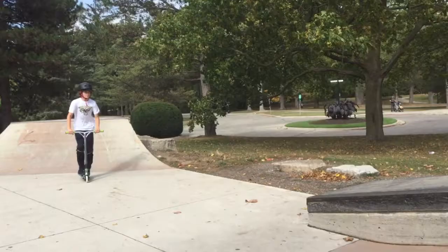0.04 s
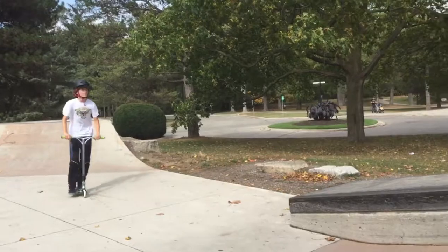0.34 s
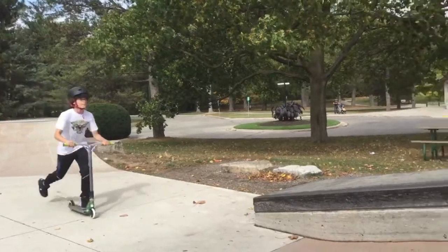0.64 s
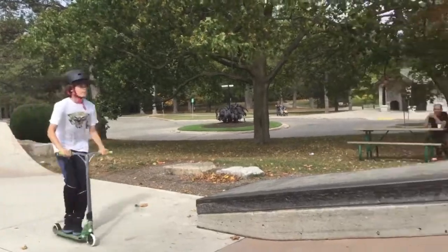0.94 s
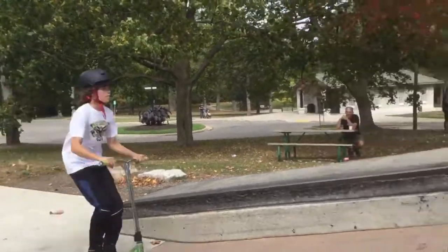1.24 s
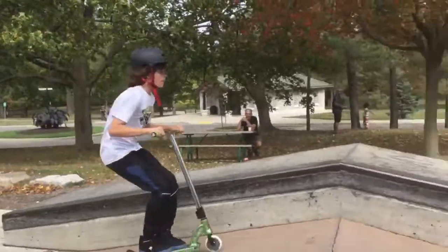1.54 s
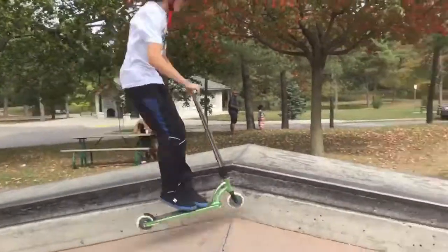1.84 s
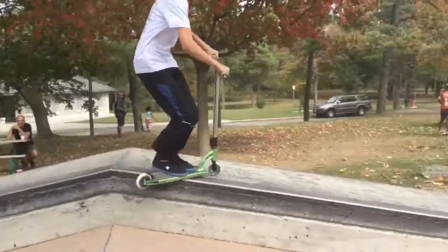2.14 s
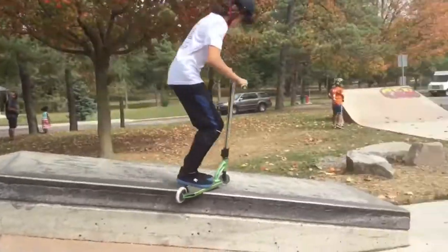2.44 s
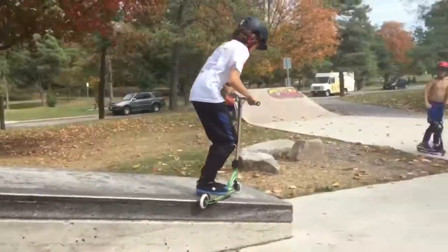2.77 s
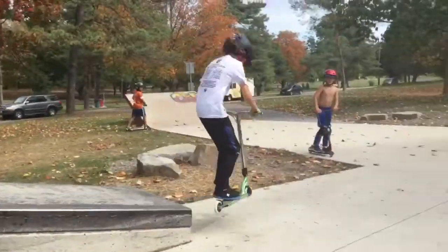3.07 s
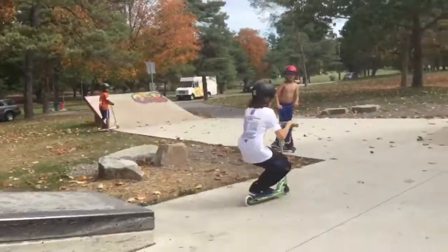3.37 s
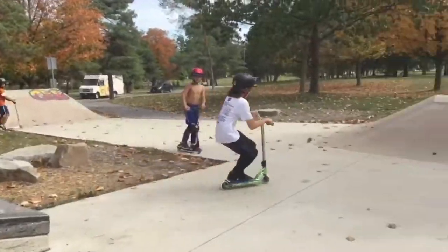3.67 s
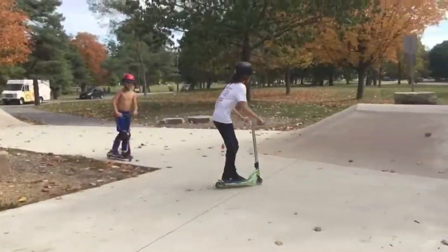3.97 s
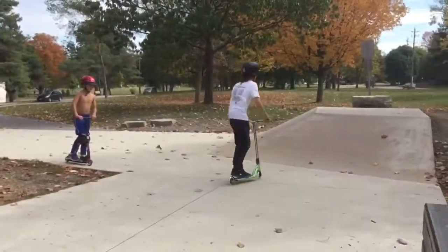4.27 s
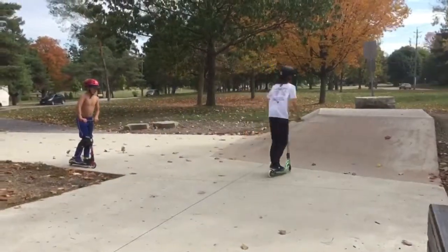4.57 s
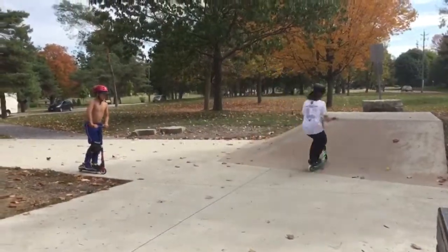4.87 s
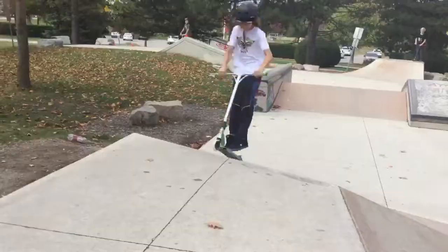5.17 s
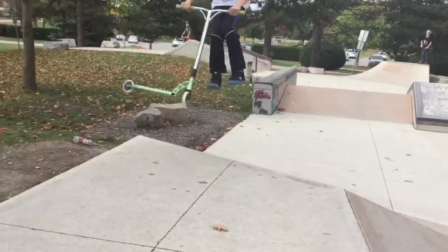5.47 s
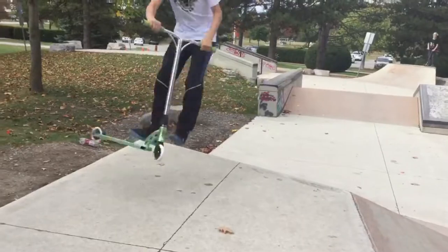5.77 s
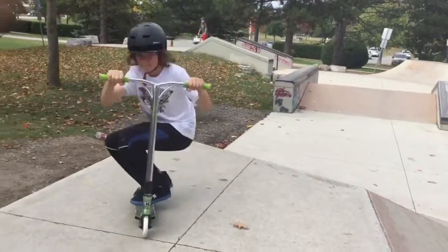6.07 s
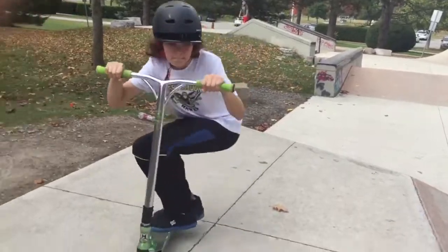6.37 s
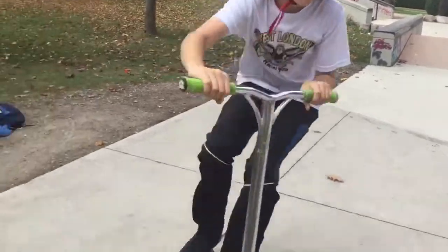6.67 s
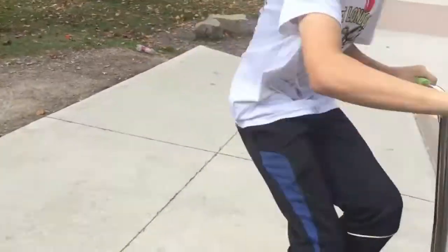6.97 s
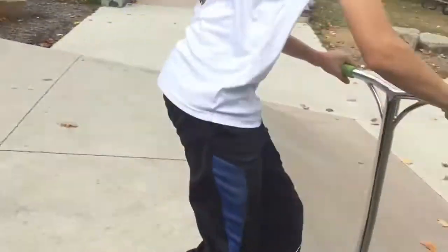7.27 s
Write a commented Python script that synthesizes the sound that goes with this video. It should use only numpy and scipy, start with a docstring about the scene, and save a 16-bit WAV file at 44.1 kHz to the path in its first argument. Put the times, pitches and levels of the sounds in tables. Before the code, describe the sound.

A stunt scooter rolls over concrete with a low rumble, light scuffs and ticking grit, heard through a small microphone against the soft wash of an outdoor skate park. A very faint bird whistle falls at about 1 second. At 2.2 seconds the deck hits a steel-edged ledge with a loud, ringing clack, then grinds along it with a rough metallic rasp until 3 seconds. The scooter clacks down at 3.3 seconds and rolls on, snapping over small stones. At 5.2 seconds the microphone changes spot, the background turns duller and a bird gives one short rising chirp. A jump lands with a heavy thump just before 6 seconds. The wheels then come close with growing hiss and rattle, and another sharp clack comes at 7 seconds. Loose parts knock and the hollow metal tubes clank loudly at around 7.3 seconds.

```python
"""A concrete skate park among trees, heard through one small microphone from two spots in turn.
From the first, a stunt scooter rolls on hard wheels, hops onto a steel-edged ledge, grinds and drops off.
From the second, it lands a jump and rattles past close by, its hollow metal tubes clanking.
Under it all: the rumble of the wheels, the wash of the open park, ticking grit and two faint bird calls."""
import sys
import numpy as np
from scipy import signal
from scipy.fft import rfft, irfft
from scipy.io import wavfile
from scipy.ndimage import map_coordinates

SR = 44100
rng = np.random.default_rng(int(sys.argv[2]) if len(sys.argv) > 2 else 0)


def pcm_store(signal):
    """Save signal as 16-bit PCM."""
    levels = np.round(np.clip(np.atleast_2d(signal), -1, 1) * 32767)
    wavfile.write(sys.argv[1], SR, levels.astype(np.int16).T)


N = 327222
TIME = np.arange(N) / SR


def from_db(db):
    """Decibels to gain."""
    return 10 ** (np.asarray(db) / 20)


def unit_rms(x):
    """Scale to rms 1."""
    return x / np.sqrt(np.mean(x ** 2) + 1e-20)


def at_level(burst, db):
    """Give a burst the energy of 10 ms at this level."""
    return burst / np.linalg.norm(burst) * np.sqrt(SR / 100) * from_db(db)


def curves(rows):
    """Each column after the time column, interpolated at every sample."""
    times, *columns = np.transpose(rows)
    return [np.interp(TIME, times, column) for column in columns]


def after(start_s, fade_s=0.069):
    """Fade from 0 to 1."""
    return np.clip((TIME - start_s) / fade_s, 0, 1)


def add(out, start_s, sound):
    """Mix a sound in at its start time."""
    i = int(round(start_s * SR))
    out[i:i + len(sound)] += sound[:N - i]


def cut(x, hz, kind, order=2):
    """Butterworth filter."""
    return signal.sosfilt(signal.butter(order, np.clip(hz, 10, .48 * SR), kind, fs=SR, output="sos"), x)


def resonate(x, hz, width_hz):
    """One resonance with gain 1 at its peak."""
    r = np.exp(-np.pi * width_hz / SR)
    feedback = [1, -2 * r * np.cos(2 * np.pi * hz / SR), r * r]
    return signal.lfilter(np.array([1, 0, -1]) * (1 - r * r) / 2, feedback, x)


def colour(x, spectrum):
    """Give a steady sound a spectrum."""
    hz, db = np.transpose(spectrum)
    gain_db = np.interp(np.log(np.fft.rfftfreq(N, 1 / SR) + 1), np.log(hz), db)
    return irfft(rfft(x) * from_db(gain_db), N)


def drift(rate_hz):
    """A random wander, rms 1."""
    knots = rng.standard_normal(int(2 * rate_hz * N / SR) + 2)
    return unit_rms(np.interp(TIME * 2 * rate_hz, np.arange(len(knots)), knots))


def waver(x, share, rate_hz):
    """Bend all pitches of a sound up and down by a small share."""
    return map_coordinates(x, [np.arange(N) + np.cumsum(share * drift(rate_hz))], order=3, mode="mirror")


def grains(per_s, spread_db=2.0):
    """Random clicks of uneven size, rms 1."""
    sizes = from_db(spread_db * np.minimum(rng.exponential(1, N), 4)) * rng.choice([-1, 1], N)
    return unit_rms(sizes * (rng.random(N) < per_s / SR))


def contact(t60_s, snap):
    """One sharp touch, then a dying crunch of tiny collisions."""
    t = TIME[:SR // 10]
    crunch = rng.standard_normal(len(t)) * np.exp(-np.log(1000) * t / t60_s)
    return crunch / np.linalg.norm(crunch) + snap * (t == 0)


def clack(hz, t60_s, breadth, snap):
    """A contact heard through a broad resonance."""
    return resonate(resonate(contact(t60_s, snap), hz, breadth * hz), hz, breadth * hz)


def struck(modes, hits):
    """A body rings; every hit meets each mode with a strength that differs by about 1 dB."""
    hz, mode_db, t60_s = np.transpose(modes)
    out, t = np.zeros(N), TIME[:SR // 2]
    rings = np.sin(2 * np.pi * hz[:, None] * t) * np.exp(-np.log(1000) * t / t60_s[:, None])
    for start_s, hit_db in hits:
        add(out, start_s, from_db(hit_db + mode_db + rng.standard_normal(len(hz))) @ rings)
    return out


def rubs(rows):
    """Short swells of friction noise, each inside one resonance."""
    out, t = np.zeros(N), TIME[:SR // 2]
    middle_s = t[-1] / 2
    for peak_s, length_s, hz, width_hz, db in rows:
        swell = np.exp(-2 * ((t - middle_s) / length_s) ** 2)
        friction = resonate(resonate(rng.standard_normal(len(t)), hz, width_hz), hz, width_hz)
        add(out, peak_s - middle_s, from_db(db) * swell * unit_rms(friction))
    return out


def rolling_bed(spectrum, rumble_db, wash_db, treble_db, rattle_db):
    """Hard wheels rumble and loose parts rattle; fine grit and the trees make a wash topped with hiss."""
    noise = colour(rng.standard_normal(N), spectrum)
    grit = colour(grains(per_s=14000), spectrum)
    rumble = unit_rms(cut(noise, 418, "low", order=4) + 0.48 * resonate(noise, 229, 220))
    wash = unit_rms(cut(noise, [450, 5500], "band", order=5)) * from_db(drift(17))
    hiss = unit_rms(cut(grit, 5800, "high", order=5)) * from_db(0.93 * drift(29))
    parts = [clack(hz, t60_s=.04, breadth=0.43, snap=.2) for hz in np.geomspace(2200, 9000, num=6)]
    rattle = sum(signal.oaconvolve(grains(per_s=5), unit_rms(part))[:N] for part in parts)
    treble = 0.75 * hiss + from_db(rattle_db) * unit_rms(rattle)
    return from_db(rumble_db) * rumble + from_db(wash_db) * wash + from_db(treble_db) * treble


# wheels and park from the first spot: frequency_hz, density_db
FIRST_SPECTRUM = [(26, -57), (45, -28.5), (68, -18.5), (217, -2), (355, -11), (401, -15), (672, -9),
                  (1510, -7.5), (1800, -7.5), (2600, -11), (3850, -21.5), (6290, -14), (12500, -23.5),
                  (16000, -28)]
# how strongly the rolling reaches the microphone there: time_s, gain_db
ROLLING = [(0.35, -0.5), (1.7, 1.5), (3.3, -4), (5.2, -0.5)]

def first_spot(lift_s=2, drop_s=3.25, pass_s=3.05):
    """The rumble sinks while the wheels are off the slab, the treble once the scooter points away."""
    roll_db, = curves(ROLLING)
    lifted = after(lift_s) - after(drop_s)
    return rolling_bed(FIRST_SPECTRUM, rumble_db=-44 + roll_db - 3.5 * lifted,
                       wash_db=-42 + 0.58 * roll_db,
                       treble_db=-47.5 + 0.41 * roll_db - 3 * after(pass_s), rattle_db=-6)


# scuffs on the concrete: peak_s, length_s, pitch_hz, width_hz, level_db
SCUFFS = [(0.31, 0.045, 2500, 3000, -46), (0.555, 0.021, 1290, 2480, -39), (0.75, 0.021, 2140, 3000, -38),
          (1.09, 0.025, 1600, 2600, -43), (4.62, 0.13, 4160, 900, -48), (4.86, 0.015, 5900, 5000, -37.5),
          (6.925, 0.039, 1000, 350, -40)]

def scuffs():
    """Shoes and tyres rub briefly on the slab."""
    return rubs(SCUFFS)


# larger stones and joints in the slab: start_s, level_db
TICKS = [(0.744, -37), (1.2994, -32), (1.93, -34), (3.0748, -34.5), (3.928, -30), (4.0696, -30),
         (4.8864, -26), (6.6774, -35.5), (6.737, -31.5), (6.7847, -31.5)]
# low thuds, through the wheels or, at 2.217 s and 3.258 s, from the hollow ledge: start_s, level_db
BUMPS = [(0.765, -37), (1.11, -43), (1.428, -38), (2.217, -24.5), (3.258, -24), (3.612, -36.5)]

def ticks_and_bumps():
    """Stones snap under the wheels and spray fine grit; low thuds come through the wheels and from the hollow
    ledge."""
    out = np.zeros(N)
    for start_s, db in TICKS:
        snap = clack(hz=2850, t60_s=0.069, breadth=0.76, snap=0.83)
        spray = cut(contact(t60_s=.035, snap=0.24), 6600, "high")
        add(out, start_s, at_level(snap, db - 10.5) + at_level(spray, db - 12))
    for start_s, db in BUMPS:
        add(out, start_s, at_level(clack(hz=151.6, t60_s=0.02, breadth=0.74, snap=0.91), db))
    return out


# two calls, faint at the microphone, one list each: time_s, pitch_hz, level_db
BIRD_CALLS = [
    [(0.9, 4630, -58), (0.97, 4500, -54), (1.14, 4350, -61), (1.18, 4330, -66)],
    [(5.25, 5900, -62), (5.265, 6600, -39), (5.283, 7600, -47), (5.3, 8200, -56)],
]

def birds(blurs_hz=(50, 520)):
    """A thin falling whistle, and an upward chirp that buzzes with fast pitch jitter."""
    out = np.zeros(N)
    for call, blur_hz in zip(BIRD_CALLS, blurs_hz):
        hz, db = curves(call)
        singing = (TIME > call[0][0]) & (TIME < call[-1][0])
        phase = 2 * np.pi * np.cumsum(hz + blur_hz * drift(700)) / SR
        out += singing * from_db(db) * np.sin(phase)
    return out


# modes of steel on steel: pitch_hz, level_db, t60_s
EDGE_MODES = [(870, -7, 0.14), (2220, -4, 0.14), (4350, -6.5, .17), (6920, 0.5, 0.079), (11150, -2, 0.065),
              (12280, 0.5, 0.061)]
# the deck meets the ledge: start_s, level_db
EDGE_HITS = [(2.2113, -28.5), (2.2172, -18.5)]

def ledge_edge():
    """The ledge's steel edge rings clear as the deck hits it."""
    return cut(struck(EDGE_MODES, EDGE_HITS), 360, "high")


# modes of the deck under the rider's feet: pitch_hz, level_db, t60_s
DECK_MODES = [(277, -4, 0.059), (326, -4.5, 0.03), (404, -2.5, 0.041), (617, -11.5, 0.033),
              (760, -11.5, 0.034), (1057, 0.5, 0.032), (1290, -15, 0.07), (1605, -10, 0.037),
              (2965, -33.5, 0.4), (8340, -30.5, 0.09)]

def blow(start_s, thump_db, clack_db, hz, t60_s, grit_db):
    """One blow clacks, crushes grit and thumps the deck, which is too small to radiate deep bass."""
    out = cut(struck(DECK_MODES, [(start_s, thump_db)]), 220, "high", order=3)
    grit = cut(contact(t60_s + 0.025, snap=0.25), [4800, 13500], "band")
    add(out, start_s, at_level(clack(hz, t60_s, breadth=0.8, snap=0.89), clack_db))
    add(out, start_s, at_level(grit, grit_db))
    return out


# wheels and deck come down on concrete:
# start_s, clack_db, pitch_hz, crunch_t60_s, grit_db, weight_lag_s, weight_db, thump_db, rebound_db
LANDINGS = [ (2.2118, -8.5, 2190, 0.042, -20, .009, -16.5, -19.5, -11),
            (3.2528, -15, 1610, .018, -33.5, .005, -27.5, -15.5, -17),
            (5.879, -36, 1800, 0.044, -37, .0085, -43, -24.5, -19),
            (5.94, -19, 1840, .027, -21, .0014, -16.5, -2, -15.5),
            (6.946, -29.5, 5660, .04, -29.5, .0075, -24.5, -31.5, -14),
            (6.9686, -18, 4530, .01, -35, .0032, -19, -14, -31)]

def landings(rebound_lag_s=.037):
    """A hard touch, then the rider's weight, duller on the squashed wheel, then a soft rebound."""
    out = np.zeros(N)
    for start_s, clack_db, hz, t60_s, grit_db, lag_s, weight_db, thump_db, rebound_db in LANDINGS:
        touch = blow(start_s, thump_db - 7.5, clack_db, hz, t60_s, grit_db)
        weight = blow(start_s + lag_s, thump_db, weight_db, 0.54 * hz, 1.6 * t60_s, grit_db - 8)
        rebound = blow(start_s + rebound_lag_s, thump_db + rebound_db, weight_db + rebound_db,
                       0.53 * hz, t60_s=.085, grit_db=grit_db - 13.5)
        out += touch + weight + rebound
    return out


# the slide along the ledge, from the first spot: time_s, level_db
GRIND_LEVELS = [(2.27, -28.5), (2.386, -38.5), (2.476, -24.5), (2.802, -33), (2.82, -29.5), (2.854, -35),
                (2.932, -34), (3.006, -23), (3.05, -48)]
# colour of the scrape: frequency_hz, density_db
GRIND_SPECTRUM = [(100, -33), (200, -5), (340, 2.5), (540, -13), (720, 1), (1700, 6), (3000, -3.5),
                  (5000, -4), (9500, -16.5), (12200, -6), (16000, -25)]
# resonances of the sliding deck: pitch_hz, width_hz, level_db
GRIND_MODES = [(330, 69, -28), (1000, 14, -10), (1570, 220, 0), (2050, 59, 3), (2830, 180, 6.5),
               (3490, 170, 0), (4050, 120, 0), (7000, 69, -15), (8800, 110, -12), (11700, 110, -17),
               (12200, 46, -23)]
# the slide catches on one resonance for a moment: peak_s, length_s, pitch_hz, width_hz, level_db
CATCHES = [(2.495, 0.05, 1000, 130, -25.5), (2.61, 0.06, 2000, 400, -35), (2.735, 0.047, 700, 60, -36.5),
           (2.818, 0.033, 2905, 130, -28.5), (2.965, 0.08, 312, 117, -37.5)]

def grind(judder_db=2.0, wander_db=2.5):
    """The deck tears over the rough ledge: dense clicks into modes that shift as the contact moves."""
    level_db, = curves(GRIND_LEVELS)
    sliding = (TIME > GRIND_LEVELS[0][0]) & (TIME < GRIND_LEVELS[-1][0])
    clicks = grains(per_s=5000) * from_db(judder_db * drift(60))
    body = sum(from_db(db + wander_db * drift(15)) * resonate(clicks, hz, width_hz)
               for hz, width_hz, db in GRIND_MODES)
    # higher up, the metal's modes crowd together and give the scrape a gritty ring
    crowded = signal.fftconvolve(clicks, contact(t60_s=0.046, snap=0.69))[:N]
    scrape = cut(clicks, 3700, "low", order=4) + cut(unit_rms(crowded), 2500, "high", order=4)
    rasp = unit_rms(colour(scrape, GRIND_SPECTRUM)) + from_db(-1) * unit_rms(cut(body, 180, "high"))
    rasp = unit_rms(waver(rasp, share=.01, rate_hz=6))
    return rasp * from_db(level_db - 1) * sliding + rubs(CATCHES)


# wheels and park from the second spot: frequency_hz, density_db
SECOND_SPECTRUM = [(45, -25.5), (90, -16.5), (136, -2), (250, 0.5), (346, -7), (465, -19), (700, -13.5),
                   (1400, -11), (2200, -16.5), (3750, -28.5), (5500, -37), (8500, -41.5), (12000, -50),
                   (16000, -43.5)]
# hiss and rattle at the microphone there: time_s, level_db
PASSING_TREBLE = [(5.23, -69.5), (5.5, -77.5), (6.55, -70), (6.68, -53.5), (6.93, -45), (7.16, -59.5),
                  (7.41, -54)]

def second_spot(pass_s=6.98):
    """The treble swells as the scooter passes close by; rumble and wash drop once it points away."""
    treble_db, = curves(PASSING_TREBLE)
    bed_db = -42 - 3 * after(pass_s)
    return rolling_bed(SECOND_SPECTRUM, bed_db, bed_db, treble_db, rattle_db=-5.5)


# knocks close to the microphone: start_s, clack_db, pitch_hz, crunch_t60_s, grit_db
KNOCKS = [(7.217, -30.5, 1780, 0.045, -66), (7.248, -28, 1470, 0.046, -66),
          (7.2755, -16.5, 1040, 0.0026, -40.5), (7.283, -36, 1500, .04, -55),
          (7.3197, -18, 2640, 0.059, -25.5), (7.4, -20.5, 1200, .1, -43)]

def loose_parts(thump_db=-32):
    """Loose parts of the scooter knock together, each shaking the deck a little."""
    return sum(blow(start_s, thump_db, *knock) for start_s, *knock in KNOCKS)


# modes of the scooter's tubes: pitch_hz, level_db, t60_s
TUBE_MODES = [(407, -20, 0.38), (662, -20.5, 0.078), (1237, -8, 0.083), (1360, -25, .15), (1690, -22, 0.21),
              (2336, 1.5, 0.026), (2580, -10, 0.095), (3170, 3.5, 0.02), (3580, -5.5, 0.13),
              (4020, -4, 0.044), (4350, -18, 0.082)]
# knocks on the tubes: start_s, level_db
CLANKS = [(7.3212, -8.5), (7.4016, -29), (7.4053, -24.5)]

def tubes():
    """The hollow metal tubes ring when knocked."""
    return cut(struck(TUBE_MODES, CLANKS), 360, "high")


def park(x, t60_s=0.3, wet_db=-16, dull_hz=6500, build_s=0.0032):
    """Ramps and trees scatter a thin, dull tail back to the microphone."""
    t = TIME[:SR * 2 // 3]
    tail = rng.standard_normal(len(t)) * np.exp(-np.log(1000) * t / t60_s) * (1 - np.exp(-t / build_s))
    tail = cut(tail / np.linalg.norm(tail), dull_hz, "low", order=1)
    tail = cut(tail, 400, "high", order=1)
    return x + from_db(wet_db) * signal.fftconvolve(x, tail)[:N]


def scene(start_s=.104, move_s=5.206):
    """Scooter and birds in the open park, in mono; the microphone changes spot at move_s."""
    bed = np.where(TIME < move_s, first_spot(), second_spot())
    events = (scuffs() + ticks_and_bumps() + birds() + ledge_edge() + landings() + grind()
              + loose_parts() + tubes())
    return ((park(events) + bed) * (TIME > start_s))[None]


def record(dry, bass_hz=81, top_hz=16000):
    """A small microphone: no deep bass, the loudest peaks rounded, the top cut."""
    rounded = 1.061 * np.tanh(cut(dry, bass_hz, "high") / 1.08)
    return signal.sosfilt(signal.ellip(10, .1, 80, top_hz, fs=SR, output="sos"), rounded)


dry = scene()
out = record(dry)
pcm_store(out)
```